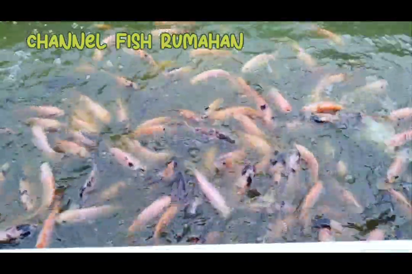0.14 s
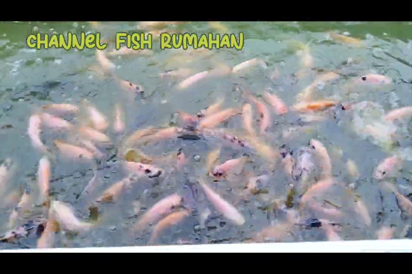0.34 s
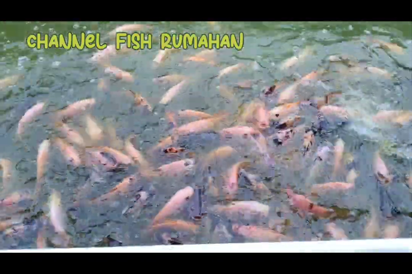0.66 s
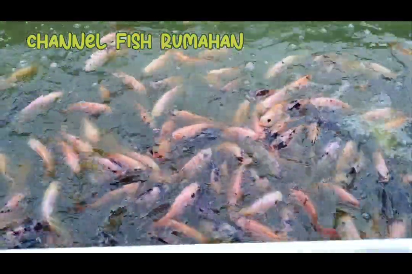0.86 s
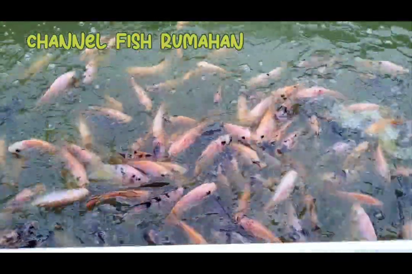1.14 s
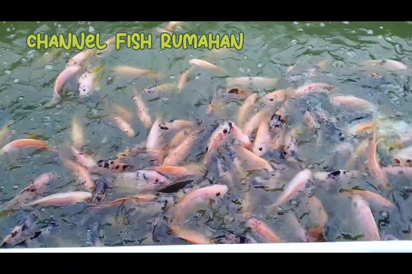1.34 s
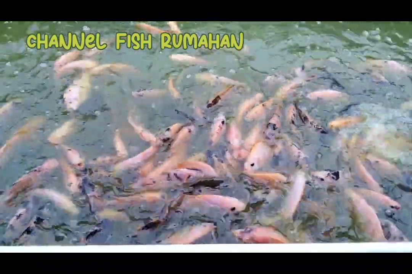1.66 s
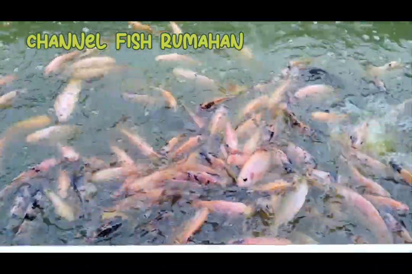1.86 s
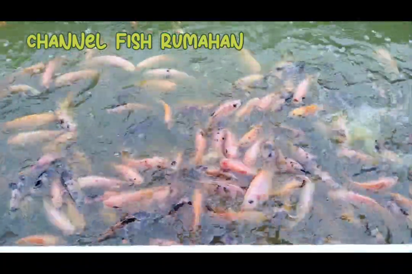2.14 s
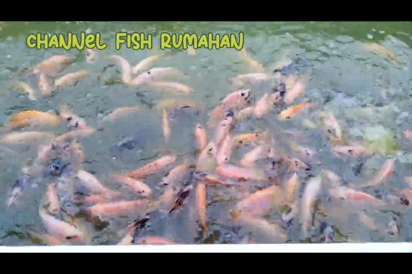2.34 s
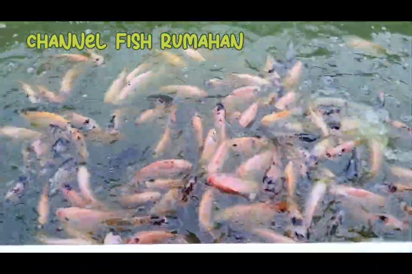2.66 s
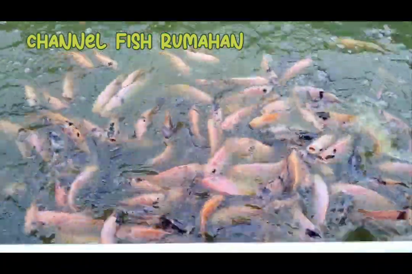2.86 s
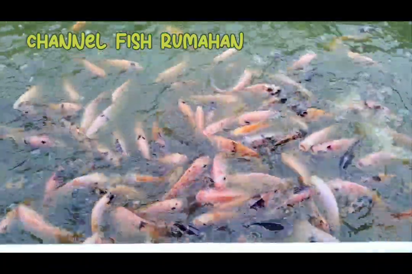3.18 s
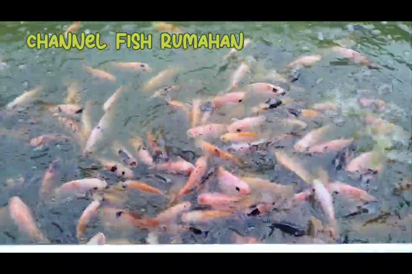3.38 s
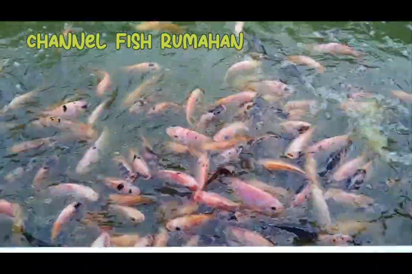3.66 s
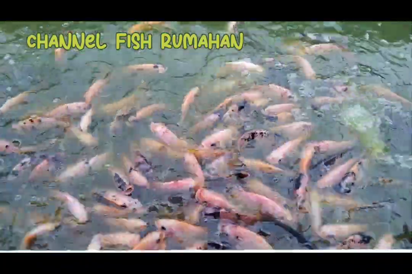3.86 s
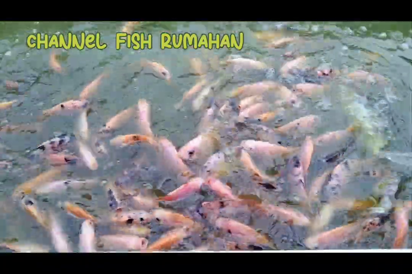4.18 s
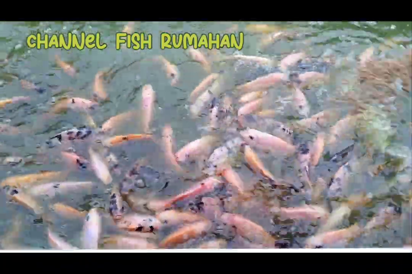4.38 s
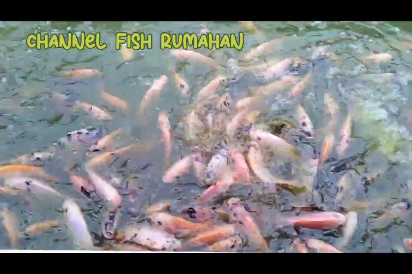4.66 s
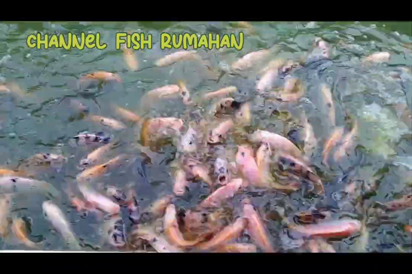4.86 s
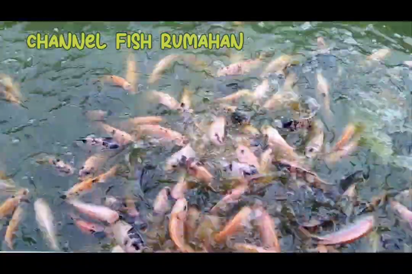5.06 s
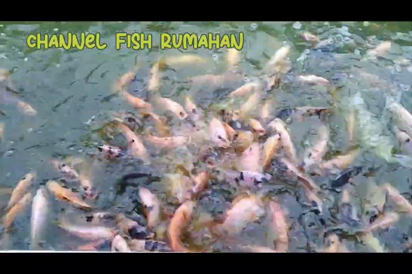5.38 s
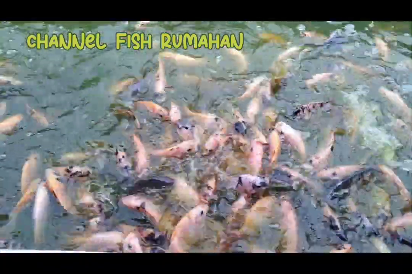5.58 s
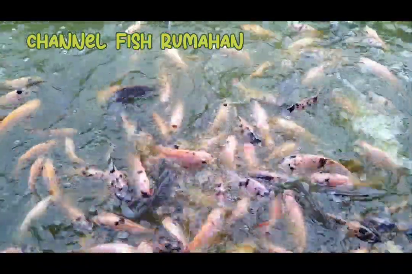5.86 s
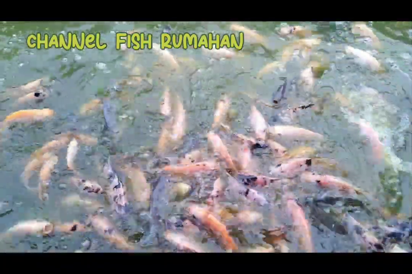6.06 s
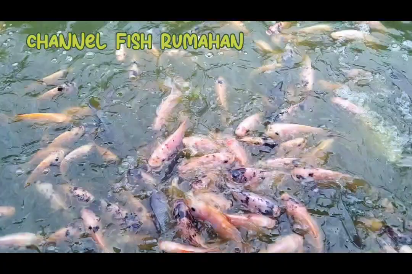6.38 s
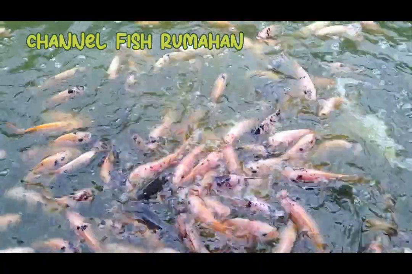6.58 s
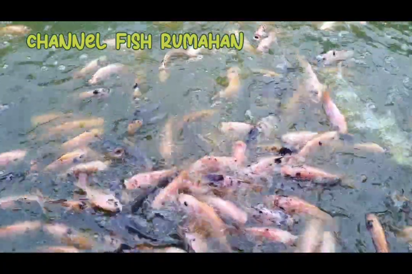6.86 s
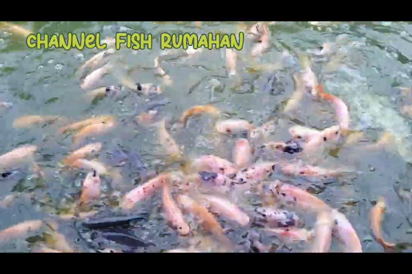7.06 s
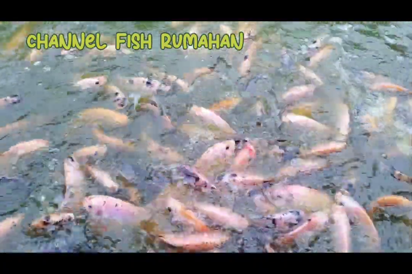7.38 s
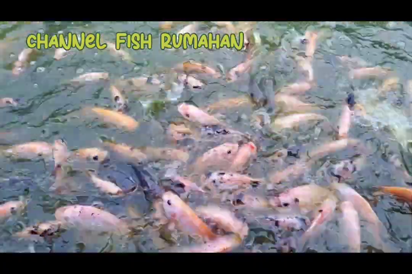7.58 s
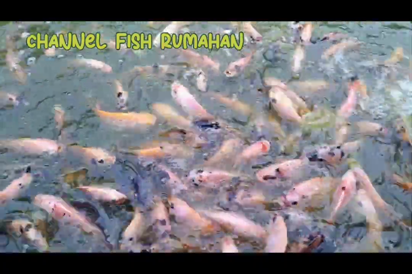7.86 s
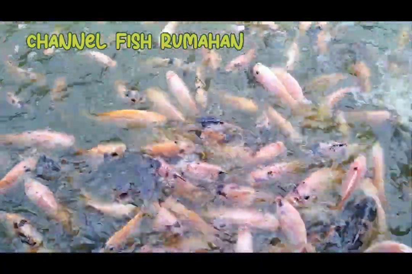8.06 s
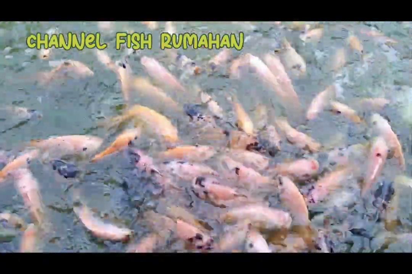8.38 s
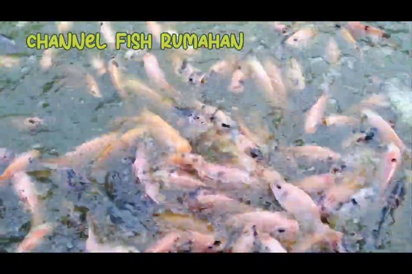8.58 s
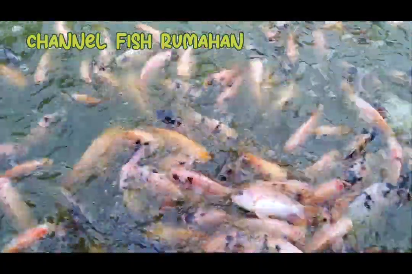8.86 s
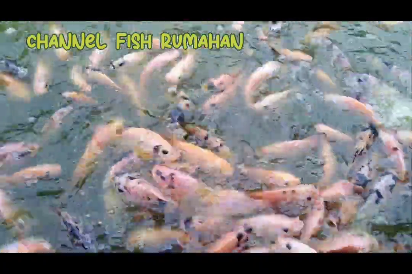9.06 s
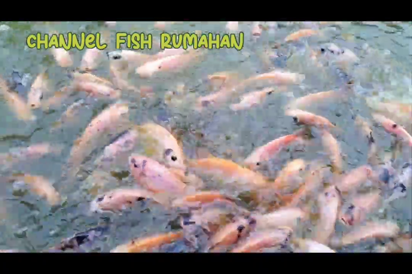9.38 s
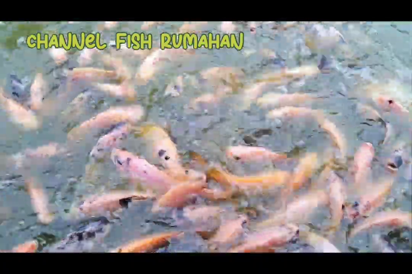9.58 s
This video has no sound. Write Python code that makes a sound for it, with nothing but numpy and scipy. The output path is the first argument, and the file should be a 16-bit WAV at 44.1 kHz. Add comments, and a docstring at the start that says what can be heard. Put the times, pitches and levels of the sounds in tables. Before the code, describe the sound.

Feeding fish plop and splash at a pond surface, sparse at first then thick and churning, over hushed rushing water, distant motor drone and thin bird whistles.

```python
"""First a hushed rush of water at a pond and a motor drone far off, then the plops of a crowd of feeding fish.
Tails and mouths trap air, which rings as bubbles; spray ticks as short rings and hiss; coloured noise rushes.
Behind the water the motor drones as shaped noise and revs once as a stack of sines; dull thuds are low noise.
A small bird whistles thinly in gliding sines. The phone's noise suppressor holds the steady rush down
and opens band by band on each splash."""
import sys
import numpy as np
from scipy import signal
from scipy.fft import rfft, irfft
from scipy.io import wavfile
from scipy.ndimage import uniform_filter1d, minimum_filter1d

SR = 44100
rng = np.random.default_rng(int(sys.argv[2]) if len(sys.argv) > 2 else 0)


def wav_record(signal):
    """Record a signal, one row per channel, as 16-bit PCM in the file named by sys.argv[1]."""
    frames = np.transpose(np.atleast_2d(signal))
    bounded = np.clip(frames, -1, 1)
    # unit amplitude maps onto the largest positive 16-bit level
    quanta = np.round(bounded * 32767).astype(np.int16)
    wavfile.write(sys.argv[1], SR, quanta)


N = 428652

# All spectra give relative density: coloured() brings the layer to rms 1 before its level is set.
# far motor, drone level: t/s, level/dB
DRONE_LEVEL = [(0, -30.5), (.42, -42), (.52, -47), (.95, -44), (1.5, -45), (1.62, -61), (1.98, -56),
               (2.05, -34), (2.2, -34.5), (2.45, -34.5), (2.68, -52), (2.78, -31.5), (3.1, -41), (3.7, -38),
               (3.85, -34), (4.6, -29), (4.88, -24.5), (5.0, -43), (6.12, -47), (6.22, -30), (6.55, -48),
               (6.7, -54), (8.6, -55), (9.05, -62), (9.72, -68)]
# drone spectrum: f/Hz, level/dB
DRONE_SPECTRUM = [(15, -55), (25, -32), (38, -17), (63, 10.5), (80, 3.5), (113, 9.5), (194, 3), (226, -22),
                  (257, 2.5), (290, -19), (330, -33), (430, -51), (730, -120)]
# humming peaks added to the drone's noise: f/Hz, width/Hz, level/dB (re the noise)
HUM_PEAKS = [(81.2, 7.3, 11.5), (202.6, 19, 10)]
# firing rate through the rev: t/s, f/Hz
FIRING_RATE = [(4.9, 26.6), (5.07, 28.2), (5.52, 28.6), (6.1, 27.6), (6.25, 27.0)]
# lines of the rev: multiple of the firing rate/1, level/dB (relative)
FIRING_ORDERS = [(1, -43), (2, -30), (3, -33), (4, -12), (5, 1.5), (6, 2), (7, 2.5), (8, -1), (9, -1.5),
                 (10, -9.5), (11, -17)]
# dull thuds: t/s, level/dB (nominal peak)
THUD_HITS = [(0.706, -14.5), (3.27, -22.5), (4.0, -24), (4.714, -16.5), (7.242, -28), (7.742, -21),
             (8.144, -24), (8.469, -29), (8.877, -30)]
# bird notes: t/s, length/s, first f/Hz, last f/Hz, level/dB
BIRD_NOTES = [(.95, 0.15, 6780, 7200, -32), (1.447, 0.16, 6960, 7030, -30), (1.821, .33, 6370, 6700, -31),
              (2.39, 0.36, 6500, 6790, -29), (3.02, 0.34, 6440, 6700, -31), (3.53, 0.19, 6480, 6700, -33),
              (3.88, 0.13, 5630, 5630, -28.5), (3.996, 0.19, 6560, 6760, -32),
              (4.409, 0.21, 6340, 6640, -30), (4.8, 0.26, 6500, 6700, -30), (5.35, 0.21, 6300, 6640, -31),
              (5.878, 0.18, 6130, 6380, -30), (6.97, 0.28, 6470, 6600, -34), (7.777, 0.13, 5770, 5660, -29),
              (7.95, 0.17, 6400, 6500, -29.5), (8.36, 0.17, 6200, 6740, -34.5),
              (8.9, 0.14, 6200, 6400, -33.5)]
# inflow spectrum: f/Hz, level/dB
RUSH_SPECTRUM = [(160, -50), (270, -43), (330, -14.5), (410, -6), (520, -15.5), (640, -10), (900, -10),
                 (1540, -2.5), (2260, -2.5), (2710, 5), (3590, -4.5), (3980, 0.5), (6000, -12), (7800, -9),
                 (13200, -120)]
# pitches at which the ripples like to ring: f/Hz, width/Hz (limited in lapping()), level/dB
RIPPLE_PITCHES = [(960, 27, -1), (1570, 170, 0.5), (1840, 130, 3), (2250, 180, -10.5), (2354, 41, -4.5),
                  (2600, 200, -16), (3047, 156, 6), (3277, 140, -1), (3680, 21, -3), (3997, 130, 0.5),
                  (4730, 300, -2), (4940, 140, -4.5), (5630, 210, -1.5)]
# the feeding crowd: t/s, churning level/dB, spray level/dB, deep sloshing level/dB, bright splashing level/dB
CROWD_LEVELS = [(0, -32.5, -25.5, -76, -37.5), (.46, -35, -26.5, -52, -55.5), (.84, -33, -26, -50, -28),
                (1.22, -37, -26.5, -60, -43), (1.65, -43.5, -27, -55, -27.5), (2.0, -41.5, -26, -56, -45),
                (2.46, -35, -25.5, -45.5, -45.5), (2.76, -39, -28, -46, -40.5),
                (3.14, -36, -27.5, -52, -31), (3.4, -40, -27.5, -54, -44), (3.98, -43.5, -27.5, -55, -35.5),
                (4.3, -38.5, -29.5, -50.5, -53), (4.52, -42, -25.5, -48, -41),
                (4.7, -26.5, -28.5, -33.5, -29), (4.85, -22, -25, -23, -34), (5.1, -16, -28, -32.5, -28),
                (5.5, -26, -28, -29, -30), (5.9, -24.5, -27, -43, -31), (6.14, -29.5, -27, -35, -40),
                (6.47, -25, -27, -55, -30), (6.87, -26.5, -28, -47, -41.5), (7.36, -28.5, -27, -57, -34),
                (7.7, -24, -26.5, -43, -32), (8.15, -27, -24, -55, -35), (8.69, -26.5, -25.5, -48.5, -30),
                (8.96, -25, -25.5, -50, -24.5), (9.1, -21.5, -25.5, -61, -31.5),
                (9.25, -25.5, -23.5, -59, -30), (9.5, -23, -23.5, -60, -27), (9.72, -31, -22.5, -49, -32.5)]
# churning spectrum: f/Hz, level/dB
CHURN_SPECTRUM = [(160, -110), (330, -53), (480, -23.5), (600, -3.5), (779, -0.5), (1220, 3.5), (1470, 6.5),
                  (1700, 2.5), (2600, -10.5), (5200, -30), (8800, -120)]
# deep sloshing spectrum: f/Hz, level/dB
SLOSH_SPECTRUM = [(200, -18), (320, -3), (400, 6), (520, -3.5), (800, -59)]
# bright splashing spectrum: f/Hz, level/dB
SPLASH_SPECTRUM = [(1200, -24), (1900, -2), (2400, 1.5), (3300, -0.5), (4300, -2), (6000, -25)]
# spray spectrum: f/Hz, level/dB
SPRAY_SPECTRUM = [(2650, 4), (4500, -5), (5210, 2), (5600, 6), (5930, -1), (6720, 9), (8230, 8.5),
                  (10100, 1.5), (12000, -1.5), (14900, 9.5), (15600, 3)]
# bursting droplets: t/s, level/dB, f/Hz, crack level/dB (re the droplet); ticks() adds fixed offsets
DROPLETS = [(0.2064, -9, 7920, -18), (0.3466, -2, 7930, -16), (0.5561, -13, 7030, -21),
            (1.1019, -13, 7080, -18), (1.9774, -11, 6730, -13), (2.1814, -2, 5550, -23),
            (2.8439, -11, 8410, -15), (3.1732, -9, 6680, -12), (3.3518, -10, 4730, -21),
            (3.5124, -10, 5500, -21), (3.9429, -10, 5530, -21), (4.3136, -6, 7090, -17),
            (4.349, -8, 8130, -22), (4.367, -8, 5450, -21), (4.3794, -5, 7740, -24),
            (4.3844, -3, 7650, -25), (4.5176, -10, 6680, -19), (4.7755, -8, 7210, -20),
            (4.9551, -11, 6740, -8), (4.9816, -5, 6740, -14), (5.1557, -8, 8080, -15),
            (5.2066, -7, 4520, -14), (5.2155, -4, 4510, -15), (5.4774, -9, 7380, -20),
            (5.5218, -6, 6410, -14), (5.7897, -11, 7010, -16), (5.9713, -10, 6240, -23),
            (6.3969, -7, 7400, -15), (6.5061, -8, 5510, -26), (6.5635, -6, 4500, -24),
            (6.5849, -9, 7640, -19), (6.6438, -8, 6740, -23), (7.7104, -10, 7340, -18),
            (7.859, -8, 7190, -13), (7.9438, -8, 6450, -15), (8.1524, -2, 7190, -13),
            (8.1808, -9, 6950, -20), (8.3265, -6, 7690, -14), (8.3913, -7, 7450, -22),
            (8.4711, -5, 6650, -12), (8.4946, -4, 7620, -24), (8.5215, -5, 7090, -19),
            (8.6004, -4, 8190, -24), (8.7565, -6, 5780, -15), (8.8303, -8, 7570, -18),
            (8.8977, -8, 4550, -22), (8.959, -9, 6410, -21), (9.2174, -6, 6430, -19),
            (9.3432, -7, 7550, -23), (9.403, -9, 6540, -19), (9.42, -2, 7610, -26), (9.4898, -9, 6200, -20),
            (9.6659, -6, 5570, -18), (4.6618, -14, 7500, -8), (7.3851, -15, 7500, -9),
            (8.5355, -6, 8300, -18), (2.2628, -11, 8900, -18), (5.1931, -12, 8800, -12),
            (6.1345, -17, 7500, -10)]
# trapped air pockets: t/s, f/Hz, level/dB (reference for the plop's parts), dying time t60/s
AIR_POCKETS = [(.19, 900, -17, .1), (.265, 1840, -16.5, 0.17), (.45, 2744, -10.5, .05),
               (.483, 910, -12, 0.038), (0.6, 880, -14, .09), (.612, 2800, -9.5, 0.14),
               (0.705, 3000, -10.5, 0.032), (.796, 2770, -16, 0.087), (0.825, 1440, -14.5, 0.081),
               (.921, 1320, -14, 0.12), (1.312, 2840, -8, .03), (1.347, 1570, -8.5, 0.065),
               (1.709, 2750, -11, .07), (1.74, 1036, -15, 0.17), (1.785, 1300, -10.5, 0.14),
               (1.938, 1630, -16, 0.035), (2.108, 1470, -14.5, 0.046), (2.29, 1720, -13.5, .08),
               (2.27, 2600, -10.5, 0.067), (2.465, 3550, -16, .14), (2.669, 1960, -10.5, .06),
               (2.72, 1850, -9, .06), (2.73, 1010, -17.5, 0.046), (2.756, 2370, -11, 0.092),
               (2.799, 3750, -10.5, .04), (2.911, 2940, -14.5, .05), (2.949, 860, -13, .1),
               (3.353, 4760, -6, .05), (3.425, 2680, -9.5, .06), (3.954, 2630, -16, 0.046),
               (4.054, 2550, -9, 0.054), (4.099, 1414, -11.5, 0.045), (4.256, 2620, -12, .15),
               (4.533, 407, -17, .06), (4.564, 2790, -9.5, 0.12), (4.624, 1324, -10, 0.13),
               (4.675, 1250, -10.5, 0.081), (4.747, 1120, -9.5, 0.11), (4.773, 2870, -13, 0.042),
               (4.845, 3840, -4.5, .08), (4.849, 754, -7, 0.052), (4.951, 770, -18, 0.056),
               (4.991, 3680, -7.5, 0.051), (5.021, 2280, -2.5, 0.055), (5.06, 1370, -9, 0.12),
               (5.1, 890, -19, 0.11), (5.138, 3550, -12, 0.038), (5.195, 2810, -4, .11),
               (5.217, 2300, -10, 0.045), (5.317, 2120, -2.5, 0.049), (5.32, 1000, -4.5, .03),
               (5.379, 3860, -10.5, 0.059), (5.592, 1400, -9, .05), (5.605, 2625, -7.5, .04),
               (5.726, 1880, -1.5, 0.09), (5.752, 3700, -5.5, .03), (5.798, 856, -8.5, 0.052),
               (5.868, 1550, -3, .13), (5.915, 1620, -8.5, .04), (5.953, 817, -7.5, 0.16),
               (6.154, 3530, -9, .06), (6.244, 1445, -7, 0.049), (6.321, 700, -12.5, 0.14),
               (6.369, 950, -7, 0.12), (6.397, 2320, 2.5, 0.027), (6.497, 1230, -9, .1),
               (6.509, 3180, -12.5, .19), (6.588, 2110, -13.5, .18), (6.788, 780, -7.5, 0.038),
               (6.864, 1370, -8, 0.033), (6.912, 1280, 3, .1), (6.929, 1320, 1.5, .1),
               (6.941, 1490, -6.5, .06), (7.098, 2020, 0, .07), (7.144, 717, -14.5, 0.31),
               (7.404, 1840, -14.5, 0.11), (7.445, 1190, -11, 0.12), (7.472, 770, -10, 0.036),
               (7.473, 2350, -7.5, 0.077), (7.543, 1365, -7.5, 0.58), (7.701, 1550, -9, 0.1),
               (7.733, 1190, -8.5, 0.029), (7.868, 3140, -12, 0.085), (7.76, 1270, -14, 0.045),
               (7.884, 1180, -5, 0.064), (7.986, 1710, -11.5, 0.077), (8.05, 1115, -7, 0.049),
               (8.117, 1410, -8, .13), (8.135, 3100, -10.5, 0.061), (8.151, 957, -5, .12),
               (8.194, 2310, -10.5, 0.074), (8.327, 3500, -14, 0.078), (8.336, 1146, -0.5, .06),
               (8.416, 1900, -11, .06), (8.447, 2410, -8.5, .07), (8.515, 650, -14.5, 0.028),
               (8.517, 2400, -6, 0.072), (8.543, 2140, -2.5, .06), (8.544, 1380, -3.5, .05),
               (8.636, 4600, -11, 0.049), (8.754, 2350, -10, .13), (8.81, 639, -17, 0.082),
               (8.819, 2120, -6.5, 0.055), (8.859, 950, -8.5, 0.15), (8.896, 2740, -3, 0.045),
               (8.958, 3680, -4, .04), (8.978, 650, -9.5, .1), (9.059, 610, -13.5, 0.046),
               (9.075, 1150, -18, 0.057), (9.132, 1133, -11.5, 0.15), (9.202, 2820, -5, 0.12),
               (9.267, 1180, -10.5, .08), (9.445, 3260, -7, .04), (9.479, 1310, -10, .05),
               (9.506, 2580, -4.5, 0.068), (9.51, 578, -13.5, .06), (9.62, 3160, -8.5, .11),
               (9.685, 884, -11, 0.14), (9.7, 914, -17.5, .1), (9.704, 1535, -5, .05),
               (.585, 764, -16.5, .1), (.625, 1244, -18.5, .1), (.95, 1050, -15.5, .14),
               (6.977, 1010, -16, .03), (7.117, 2950, -11, .03), (5.09, 1610, -5, .06),
               (4.885, 860, -6, .06), (5.88, 1420, -17.5, .05), (9.35, 605, -22, .14),
               (0.145, 1120, -21.5, 0.1), (0.286, 2790, -40, 0.17), (0.644, 1680, -14, 0.14),
               (0.873, 3940, -13, 0.03), (0.963, 1890, -20, 0.13), (1.053, 2720, -11, 0.25),
               (1.154, 1677, -21, 0.03), (1.276, 2940, -15, 0.05), (1.384, 3900, -24, 0.12),
               (1.46, 2830, -14, 0.04), (1.47, 1025, -21.5, 0.14), (1.482, 1300, -23, 0.061),
               (1.685, 1870, -17.5, 0.09), (1.813, 3380, -17, 0.14), (1.935, 1200, -17, 0.031),
               (1.983, 1130, -33, 0.085), (2.21, 3850, -21, 0.18), (2.268, 3930, -11.5, 0.028),
               (2.443, 2440, -22.5, 0.091), (2.611, 1840, -37, 0.11), (2.611, 4750, -19, 0.06),
               (2.659, 2660, -13, 0.034), (2.717, 4900, -24, 0.03), (2.902, 1370, -18, 0.06),
               (2.954, 2210, -18, 0.027), (3.052, 3360, -29, 0.03), (3.094, 1590, -22, 0.03),
               (3.104, 3000, -24, 0.1), (3.208, 1456, -16, 0.14), (3.228, 2380, -19, 0.1),
               (3.345, 2480, -17, 0.14), (3.567, 2130, -16, 0.078), (3.623, 1820, -14.5, 0.14),
               (3.665, 4000, -18, 0.16), (3.673, 1310, -31, 0.093), (3.752, 2660, -15.5, 0.09),
               (3.768, 3770, -17, 0.14), (3.772, 3000, -13, 0.03), (3.784, 1320, -22, 0.07),
               (3.996, 2430, -15, 0.17), (4.014, 1930, -17, 0.1), (4.114, 636, -24.5, 0.21),
               (4.118, 2150, -14.5, 0.067), (4.255, 3360, -20, 0.06), (4.313, 3030, -15, 0.039),
               (4.433, 3960, -19, 0.042), (4.475, 1060, -22.5, 0.1), (4.774, 2200, -8.5, 0.07),
               (5.321, 2690, -3.5, 0.03), (5.578, 3860, -13.5, 0.1), (6.001, 2240, -11, 0.05),
               (6.077, 5000, -18, 0.03), (6.153, 3980, -18, 0.06), (6.205, 3580, -9.5, 0.13),
               (6.339, 3170, -17, 0.14), (6.396, 4120, -25, 0.11), (6.454, 338, -25, 0.11),
               (6.644, 3650, -13, 0.03), (6.712, 1090, -16.5, 0.031), (6.744, 900, -20, 0.024),
               (6.843, 3350, -13.5, 0.17), (6.883, 2200, -14, 0.14), (7.095, 2870, -17, 0.12),
               (7.382, 3270, -9, 0.13), (7.464, 2980, -26, 0.027), (7.518, 3000, -16, 0.03),
               (7.538, 3370, -13, 0.14), (8.033, 2370, -14, 0.05), (8.326, 4270, -13, 0.07),
               (8.332, 2420, -8, 0.14), (8.47, 1130, -18, 0.13), (8.506, 1840, -15, 0.08),
               (8.759, 1460, -11.5, 0.022), (8.849, 5100, -9.5, 0.023), (9.418, 2130, -27, 0.08),
               (9.685, 3940, -24, 0.024)]
# suppressor, most cut: f/Hz, cut/dB (below zero means none)
CUT_DEPTH = [(330, 13), (450, 17), (2000, 25), (4500, 27), (6300, 20), (8500, 1), (11500, 14), (14000, -9)]
# suppressor, rise above the recent low that starts to open a band: f/Hz, rise/dB
OPENING_MARGIN = [(300, 10), (2000, 7.5), (4000, 6), (7000, 4), (11000, 8), (15000, -5)]

REV_START_S, REV_END_S, REV_DB = 4.87, 6.26, -28
REV_RISE_S, REV_FADE_S, REV_ROUGH_DB = .1, .22, 2
FLOOR_DB = -56.5  # faint even rumble
THUD_RISE_S, THUD_T60_S, THUD_TOP_HZ = .015, .6, 200
RUSH_DB, LAPPING_DB = -26.5, -30
INFLOW_FOLLOWS = 0.41  # share of the spray's swing in dB that lapping and rush follow
FOAM_LOW_HZ, FOAM_HIGH_HZ = 9000, 15000
FOAM_DB, FOAM_SWING_DB = -12, 2  # foam against spray; its random swing
SLAP_FULL_DB, SLAP_STEEPNESS = -8, 0.43  # plops under this level slap less, by so many dB per dB
FROTH_DB, FROTH_SPAN = -15.5, 1.135  # froth against the plop's level; its band as a ratio about the pitch
WATER_LOW_HZ = 338  # the pond gives no bass
SUPPRESSED_FROM_HZ, OPENING_DB, RELEASE_DB_PER_S = 300, 2.5, 189
CUTOFF_HZ = 15600


def from_db(db):
    """Amplitude factor of a level in dB."""
    return 10 ** (np.asarray(db) / 20)


def rms_one(x):
    """x scaled to rms 1."""
    return x / np.sqrt(np.mean(x ** 2) + 1e-20)


def in_time(rows):
    """Columns of a curve at every sample."""
    s, *columns = np.transpose(rows)
    return [np.interp(np.arange(N) / SR, s, column) for column in columns]


def at_hz(points, hz):
    """A spectrum read on a log-frequency axis."""
    points = np.array(points)
    return np.interp(np.log(hz + 1), np.log(points[:, 0]), points[:, 1])


def filtered(x, order, hz, kind):
    """x through a Butterworth filter."""
    return signal.sosfilt(signal.butter(order, hz, kind, fs=SR, output="sos"), x)


def coloured(x, spectrum):
    """x through a spectrum, rms 1."""
    hz = np.arange(N // 2 + 1) * SR / N
    return rms_one(irfft(rfft(x) * from_db(at_hz(spectrum, hz)), N))


def drift(rate):
    """Slow chance, rms 1: noise at a fortieth of SR through a double pole at rate Hz."""
    r = np.exp(-80 * np.pi * rate / SR)
    noise = rng.standard_normal(N // 40 + 2002)
    slow = signal.lfilter([1], [1, -2 * r, r * r], noise)[2000:]
    return np.interp(np.arange(N) / 40, np.arange(len(slow)), rms_one(slow))


def add_bubble(out, s, hz, level_db, cycles, rise):
    """A sine that swells within half a cycle, dies 60 dB in so many cycles and climbs as it nears the surface."""
    turns = np.arange(int(cycles * SR / hz)) * hz / SR
    wave = np.sin(2 * np.pi * turns * (1 + rise * turns / cycles))
    wave *= from_db(level_db - 60 * turns / cycles)
    wave *= np.sin(np.pi / 2 * np.minimum(turns / 0.42, 1)) ** 2
    i = min(int(s * SR), N)
    out[i:i + len(wave)] += wave[:len(out) - i]


def uneven_sizes(spread_db, most):
    """Random strengths of either sign, one per sample, with a limited exponential spread in dB."""
    return from_db(spread_db * np.minimum(rng.exponential(1, N), most)) * rng.choice([-1, 1], N)


def grains(per_s, low_hz, high_hz, cycles, spread_db, count):
    """Random bubbles of uneven size dealt to resonators spread in pitch; rms 1."""
    clicks = uneven_sizes(spread_db, 5) * (rng.random(N) < per_s / SR)
    dealt, out = rng.integers(0, count, N), 0
    for k, hz in enumerate(np.geomspace(low_hz, high_hz, count)):
        r, w = from_db(-60 * hz / (cycles * SR)), 2 * np.pi * hz / SR
        excitation = clicks * (dealt == k) + 1e-18
        out = out + signal.lfilter([0, np.sin(w)], [1, -2 * r * np.cos(w), r * r], excitation)
    return rms_one(out)


def motor_drone():
    """Far off: low noise with humming peaks and a rough level, over a faint even rumble."""
    drone_db, = in_time(DRONE_LEVEL)
    all_hz = np.arange(N // 2 + 1) * SR / N
    hum = 1 + sum(from_db(db) / (1 + (2 * (all_hz - hz) / width) ** 2) for hz, width, db in HUM_PEAKS)
    humming = irfft(rfft(rng.standard_normal(N)) * hum, N)
    drone = coloured(humming, DRONE_SPECTRUM) * from_db(drone_db + 3.0 * drift(8.6))
    rumble = rms_one(signal.lfilter([1], [1, -.97], rng.standard_normal(N))) * from_db(FLOOR_DB)
    return drone + rumble


def motor_rev():
    """The firing rate runs up, holds and sags; its multiples stand out as rough lines."""
    firings, = in_time(FIRING_RATE)
    s = np.arange(N) / SR
    fade_in = np.clip((s - REV_START_S) / REV_RISE_S, 0, 1)
    fade_out = np.clip((REV_END_S - s) / REV_FADE_S, 0, 1)
    phase = 2 * np.pi * np.cumsum(firings) / SR
    orders = 0
    for k, level_db in FIRING_ORDERS:
        rough = from_db(level_db + REV_ROUGH_DB * drift(16.0))
        orders = orders + rough * np.sin(k * phase + 2 * np.pi * rng.random())
    return rms_one(orders) * from_db(REV_DB) * fade_in * fade_out


def thuds():
    """Puffs of low noise that swell quickly and die away."""
    s, swell = np.arange(N) / SR, 0
    for start, level_db in THUD_HITS:
        after = np.maximum(s - start, 0)
        dying = from_db(level_db - 60 * after / THUD_T60_S)
        swell = swell + np.minimum(after / THUD_RISE_S, 1) * dying
    low = filtered(rng.standard_normal(N), 3, [55, THUD_TOP_HZ], "band")
    return rms_one(low) * swell / 2  # noise peaks at about twice its rms


def bird():
    """Near sines that slide fast, mostly up, then level off; pitch wobbles and level flutters."""
    out, wobble, flutter = np.zeros(N), drift(30), from_db(3 * drift(35))
    for s, length, first_hz, last_hz, level_db in BIRD_NOTES:
        i, part = int(s * SR), np.linspace(0, 1, int(length * SR))
        slide = last_hz + (first_hz - last_hz) * (1 - part) ** 2.6
        hz = slide + 45 * wobble[i:i + len(part)]
        note = np.sin(2 * np.pi * np.cumsum(hz) / SR)
        out[i:i + len(part)] += note * np.sin(np.pi * part) ** 0.15 * from_db(level_db)
    return out * flutter


def lapping(per_s, spread_db):
    """Small wavelets excite the favoured pitches in uneven spells, each pitch on its own; rms 1."""
    out, sizes = 0, uneven_sizes(spread_db, 4)
    for hz, width, level_db in RIPPLE_PITCHES:
        clicks = sizes * (rng.random(N) < per_s * from_db(4 * drift(4)) / SR)
        r = np.exp(-np.pi * np.clip(width, 30, 120) / SR)
        poles = [1, -2 * r * np.cos(2 * np.pi * hz / SR), r * r]
        ring = signal.lfilter([1, 0, -1], poles, clicks + 1e-18)
        out = out + from_db(level_db) * rms_one(ring)
    return rms_one(out)


def inflow(spray_db):
    """Coloured noise rushes almost evenly with ringing ripples; both swell a little with the spray."""
    stirred = from_db(INFLOW_FOLLOWS * (spray_db - spray_db.mean()))
    rush = coloured(rng.standard_normal(N), RUSH_SPECTRUM) * from_db(RUSH_DB)
    return stirred * (rush + lapping(160, spread_db=4.5) * from_db(LAPPING_DB))


def gurgling():
    """Many long-ringing bubbles of low and middle pitch that come in uneven spells."""
    return grains(1300 * from_db(3.9 * drift(7.8)), 300.5, 2998, cycles=39.4, spread_db=3.5, count=18)


def sloshing(gurgle, slosh_db):
    """The gurgle mixed with noise, coloured deep."""
    slosh = coloured(gurgle + 1.2 * rng.standard_normal(N), SLOSH_SPECTRUM)
    return slosh * from_db(slosh_db + 2.6 * drift(13.4))


def churning(gurgle, churn_db):
    """The gurgle mixed with noise, coloured towards the middle."""
    churn = coloured(gurgle + 0.82 * rng.standard_normal(N), CHURN_SPECTRUM)
    return churn * from_db(churn_db + 2.23 * drift(8.1))


def splashing(splash_db):
    """Bright splashes: mid-high ringing drops mixed with noise."""
    drops = grains(900 * from_db(4 * drift(19)), 1894, 4570, cycles=51.0, spread_db=3.0, count=14)
    splash = coloured(drops + 0.53 * rng.standard_normal(N), SPLASH_SPECTRUM)
    return splash * from_db(splash_db + 1.4 * drift(16))


def spray_and_foam(spray_db):
    """Spray fizzes as brief high rings in noise; finer, sparser grains crackle above it as foam."""
    fizz = grains(4000 * from_db(4 * drift(25)), 4610, 10300, cycles=8.5, spread_db=4.5, count=6)
    spray = coloured(fizz + 0.88 * rng.standard_normal(N), SPRAY_SPECTRUM)
    spray = spray * from_db(spray_db + 1.16 * drift(12.4) + 0.2)
    foam_rate = 300 * from_db(5.1 * drift(33))
    foam = grains(foam_rate, FOAM_LOW_HZ, FOAM_HIGH_HZ, cycles=5.6, spread_db=6.0, count=4)
    return spray + foam * from_db(spray_db + FOAM_DB + FOAM_SWING_DB * drift(2.9))


def water():
    """The crowd's splashing and spray over the inflow."""
    churn_db, spray_db, slosh_db, splash_db = in_time(CROWD_LEVELS)
    gurgle = gurgling()
    crowd = churning(gurgle, churn_db) + spray_and_foam(spray_db)
    crowd = crowd + sloshing(gurgle, slosh_db) + splashing(splash_db)
    return crowd + inflow(spray_db)


def ticks():
    """Droplets burst in a few cycles, with a finer crack on top and a short hiss of mist after."""
    out, bursts = np.zeros(N), np.zeros(N)
    for (s, level_db, hz, crack_db), size in zip(DROPLETS, rng.random(len(DROPLETS))):
        add_bubble(out, s, hz, level_db + 4, cycles=14.0, rise=.1)
        add_bubble(out, s, 11500 + 3500 * size, level_db + crack_db + 21, cycles=4.2, rise=.03)
        bursts[int(s * SR)] = from_db(level_db + 1.08 * crack_db + 3.5)
    dying = signal.lfilter([1], [1, -from_db(-60 / (.07 * SR))], bursts + 1e-18)  # t60 .07 s
    mist = filtered(rng.standard_normal(N), 2, 4000, "high")
    return out + dying * mist


def plops(count=8):
    """A pocket of air breaks into a slap, a first bubble, a dying train of like-sized ones and froth."""
    out, noise = np.zeros(N + SR), rng.standard_normal(N + SR)
    chances = rng.random((len(AIR_POCKETS), count, 3))
    for (s, hz, level_db, t60), draw in zip(AIR_POCKETS, chances):
        add_bubble(out, s, hz, level_db + 0.5, cycles=21.0, rise=0.059)
        slap_db = level_db + SLAP_STEEPNESS * min(level_db - SLAP_FULL_DB, 0)
        add_bubble(out, s, 1.29 * hz, slap_db, cycles=8.9, rise=0.069)
        for late, size, loud in draw:
            after = late * min(t60, .3) * 0.41
            train_hz = hz * (1 + 0.3 * (size - .45))
            train_db = level_db - 60 * after / t60 - 7 * np.sqrt(loud)
            add_bubble(out, s + after, train_hz, train_db, cycles=52.4, rise=0.057)
        i, after = int(s * SR), np.arange(int(0.75 * t60 * SR)) / SR
        froth = rms_one(filtered(noise[i:i + len(after)], 3, [hz / FROTH_SPAN, hz * FROTH_SPAN], "band"))
        out[i:i + len(after)] += froth * from_db(level_db + FROTH_DB - 40 * after / t60)
    return out[:N]


def scene():
    """All sources at one microphone."""
    pond = filtered(plops() + ticks() + water(), 4, WATER_LOW_HZ, "high")
    motor = motor_rev() + motor_drone()
    return (pond + motor + thuds() + bird())[None]


def suppress(x):
    """Each band is cut while it stays near its recent low, opens at once above it, holds and closes slowly."""
    hz, s, z = signal.stft(x, SR, nperseg=640, noverlap=512)
    power = np.abs(z) ** 2 + 1e-16
    level_db = 10 * np.log10(uniform_filter1d(power, size=5, axis=1))
    calm_db = 10 * np.log10(uniform_filter1d(power, size=41, axis=1))
    # the lowest of 601 frames (1.7 s), nearly all of them past
    low_db = minimum_filter1d(calm_db, size=601, axis=1, origin=250, mode="mirror")
    depth_db = (np.maximum(at_hz(CUT_DEPTH, hz), 0) * (hz > SUPPRESSED_FROM_HZ))[:, None]
    margin_db = at_hz(OPENING_MARGIN, hz)[:, None]
    opened = (level_db - low_db - margin_db) / OPENING_DB
    wanted_db = -depth_db * np.clip(1 - opened, 0, 1)
    held_db = -minimum_filter1d(-wanted_db, size=17, axis=1, origin=8)  # highest gain of the last 17 frames
    released = RELEASE_DB_PER_S * s
    gain_db = np.maximum.accumulate(held_db + released, axis=1) - released
    return signal.istft(z * from_db(gain_db), SR, nperseg=640, noverlap=512)[1][:N]


def record(dry):
    """The phone: suppressor, rounded peaks, weak deep bass, steep top cut."""
    rounded = 1.15 * np.tanh(suppress(dry[0]) / 1.15)
    thinned = filtered(rounded, 2, 50, "high")
    return signal.sosfilt(signal.ellip(14, .5, 95, CUTOFF_HZ, fs=SR, output="sos"), thinned)[None]


dry = scene()
out = record(dry)
wav_record(out)
```